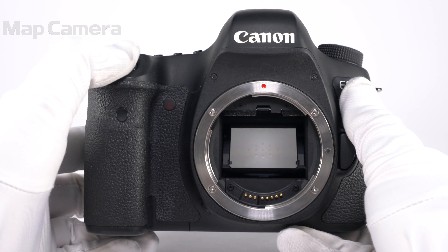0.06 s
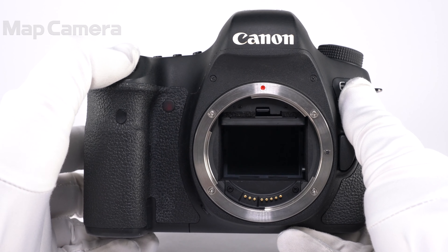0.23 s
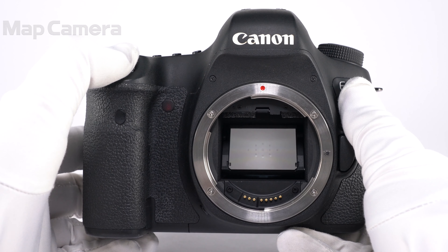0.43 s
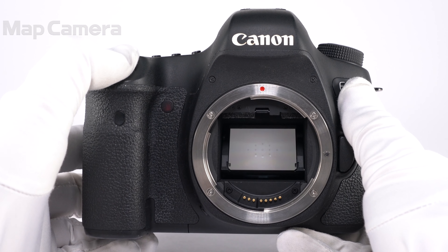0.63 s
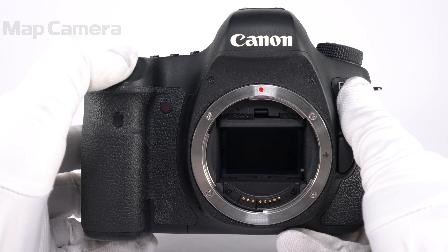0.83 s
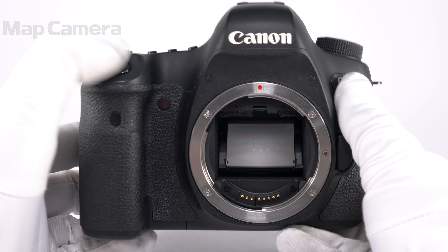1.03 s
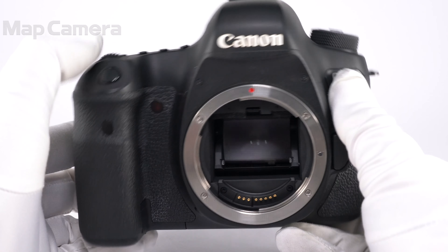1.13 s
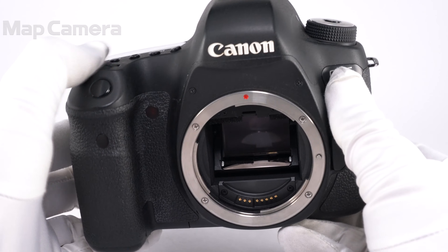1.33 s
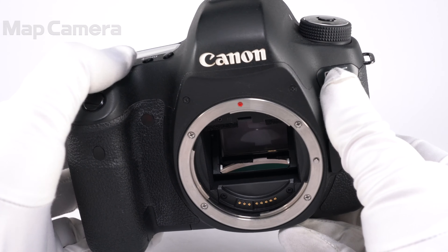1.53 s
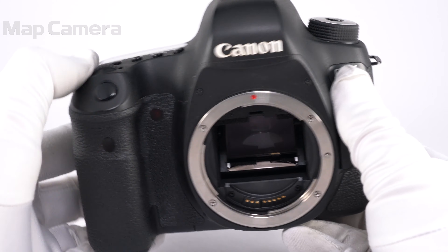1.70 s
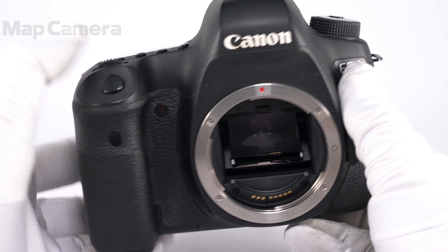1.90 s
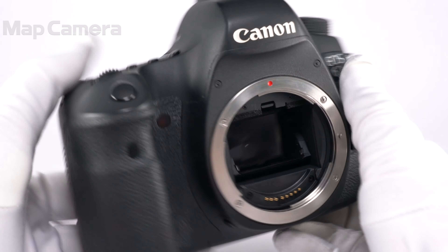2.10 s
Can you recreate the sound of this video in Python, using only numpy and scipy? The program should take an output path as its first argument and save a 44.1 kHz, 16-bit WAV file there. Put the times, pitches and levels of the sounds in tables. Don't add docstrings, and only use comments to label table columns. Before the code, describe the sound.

Three fast, loud reflex camera shutter releases up close, followed by handling bumps and small ratchety clicks

```python
import sys
import numpy as np
from scipy import signal
from scipy.fft import rfft, irfft
from scipy.io import wavfile
from scipy.ndimage import uniform_filter1d

SR = 44100
rng = np.random.default_rng(int(sys.argv[2]) if len(sys.argv) > 2 else 0)


def dump_mix(stems):
    frames = np.atleast_2d(stems).T
    limited = np.clip(frames, -1, 1)
    pcm = np.round(limited * 32767).astype(np.int16)
    wavfile.write(sys.argv[1], SR, pcm)


def makeup_ratio(level_db):
    decades = np.asarray(level_db, float) / 20
    return 10 ** decades


N = 94815


def noise(n):
    return rng.standard_normal(n)


def evened(x):
    return x / np.sqrt(np.mean(x ** 2) + 1e-20)


def add(mix, start_s, sound):
    part = mix[round(start_s * SR):][:len(sound)]
    part += sound[:len(part)]


def curve(points, t, **outside):
    return makeup_ratio(np.interp(t, *np.transpose(points), **outside))


def colour(tone, peaks=(), between_db=0):
    hz = np.fft.rfftfreq(8192, 1 / SR)
    tone_hz, tone_db = np.transpose(tone)
    broad_db = np.interp(np.log(hz + 1), np.log(tone_hz), tone_db)
    power = makeup_ratio(2 * (broad_db + between_db))
    for peak_hz, width_hz, peak_db in peaks:
        power = power + makeup_ratio(2 * peak_db) / (1 + (2 * (hz - peak_hz) / width_hz) ** 2) ** 2
    cepstrum = irfft(np.log(power + 1e-10) / 2)
    cepstrum = cepstrum * np.r_[1, 2 * np.ones(4095), 1, np.zeros(4095)]
    taps = irfft(np.exp(rfft(cepstrum)))[:4096]
    return taps / np.linalg.norm(taps)


def band(x, hz, width_hz):
    radius = np.exp(-np.pi * width_hz / SR)
    poles = [1, -2 * radius * np.cos(2 * np.pi * hz / SR), radius * radius]

    def resonate(v):
        return signal.lfilter([1, 0, -1], poles, signal.lfilter([1], poles, v))

    return resonate(x) / np.linalg.norm(resonate(np.r_[1, np.zeros(8000)]))


def blow(t, rise_s, t60_s):
    u = np.maximum(t, 0)
    rise = np.sin(np.pi / 2 * np.minimum(u / rise_s, 1)) ** 2
    return rise * makeup_ratio(-60 * np.maximum(u - rise_s, 0) / t60_s)


# pitch_hz, level_db
ROOM_TONE = [(12, -45), (20, -10.5), (60, -10.5), (262, -3.5), (388, -7.5), (1000, -13.5), (1810, -17),
             (2530, -19), (16000, -34.5)]
# pitch_hz, width_hz, level_db
HUM_BANDS = [
    (73.7, 14, -64),
    (250, 53, -61.5),
]


def room():
    air = signal.fftconvolve(noise(N + 4096), colour(ROOM_TONE), "valid")[:N]
    out = makeup_ratio(-58) * evened(air)
    for hz, width_hz, db in HUM_BANDS:
        out += makeup_ratio(db) * evened(band(noise(N + 9000), hz, width_hz)[9000:])
    whistle_hz, whistle_db = 13356, -76.5
    return out + makeup_ratio(whistle_db) * np.sin(2 * np.pi * whistle_hz * np.arange(N) / SR)


# time_s, level_db
SLIDE_LEVEL = [(0, -55.5), (.1, -62.5), (1.042, -62.5), (1.15, -58.5), (1.331, -64.5), (1.404, -46),
               (1.48, -90), (1.619, -51), (1.72, -48), (1.79, -54.5), (1.9, -47.5), (1.96, -43.5),
               (2.08, -44), (2.13, -39), (2.15, -39.5)]
# pitch_hz, width_hz, level_db
TABLE_PEAKS = [(270, 90, -16.5), (476.5, 40, 3), (660, 50, 1.5), (6500, 500, -16)]
# pitch_hz, level_db
RUB_TONE = [(35, -38), (60, -4), (124, -7.5), (301, -7), (579, -12), (682, -8.5), (1140, -10.5),
            (8510, -17), (16000, -26)]


def slide():
    grip = makeup_ratio(1.3 * evened(uniform_filter1d(noise(N), size=500)))
    rub = signal.fftconvolve(noise(N) * grip, colour(RUB_TONE, TABLE_PEAKS))[:N]
    return evened(rub) * curve(SLIDE_LEVEL, np.arange(N) / SR)


# after_release_s, level_db
MOTOR_EFFORT = [(-.010, -80.5), (-.006, -33.5), (.004, -20), (.041, -36), (.055, -22.5), (.088, -30.5),
                (.15, -28.5), (.184, -40.5), (.204, -63)]
# pitch_hz, width_hz, level_db
GEAR_RINGS = [(475, 45, -2), (930, 90, 0), (2990, 200, 0), (3450, 350, -1), (4500, 300, -7),
              (6800, 300, -6), (10500, 400, -10)]
# pitch_hz, level_db
GEAR_COLOUR = [(59, -62), (100, -31), (492, -5.5), (736, -5.5), (2630, -2.5), (3050, -1.5), (4020, -3),
               (10700, -9.5), (16000, -20)]


def motor(t):
    teeth_per_s, spread_db = 2300, 4.5
    dull_hz, dull_db, dull_from_s = 2630, 8, .15
    meets = rng.random(len(t)) < teeth_per_s / SR
    strength = makeup_ratio(spread_db * np.minimum(rng.exponential(1, len(t)), 4))
    grind = noise(len(t))
    teeth = evened(meets * strength * np.sign(grind) + 1.6 * grind)
    teeth = teeth * curve(MOTOR_EFFORT, t, left=-120, right=-120)
    dull = signal.lfilter(*signal.butter(2, dull_hz, fs=SR), teeth)
    teeth += makeup_ratio(dull_db) * (t > dull_from_s) * dull
    return signal.fftconvolve(teeth, colour(GEAR_COLOUR, GEAR_RINGS, -8))[:len(t)]


# after_release_s, level_db, rise_s, t60_s
LATCH_BLOWS = [
    (-.0045, -39, .001, .05),
    (0.0003, -7.5, .0006, 0.022),
    (.0045, -16, 0.001, 0.03),
    (.0105, -25.5, .001, .03),
    (.0125, -25.5, .001, .03),
]
MIRROR_BLOWS = [
    (.0155, -18, .003, .06),
    (.0195, -13.5, .002, .04),
    (.022, -10.5, .0012, .03),
    (.0258, -16.5, .0012, .035),
    (.0285, -13, .0012, .03),
    (.036, -35, .001, .03),
]
OPEN_BLOWS = [
    (.0438, -22, .0007, .025),
    (.047, -27, .001, .03),
    (.0502, -13, .0007, .016),
    (.0535, -23, .001, .04),
    (.0572, -23, .0008, .03),
]
SHUT_BLOWS = [
    (.0655, -12, 0.0006, 0.018),
    (.070, -23, 0.0012, 0.045),
]
RECOCK_BLOWS = [(.0915, -23.5, .002, 0.075), (.101, -16.5, .003, 0.039), (.1060, -11.5, .002, .03),
                (.1140, -18, .001, .025), (.1198, -23.5, .001, .025), (.1245, -16, .002, 0.06),
                (.1310, -14.5, .0012, .03), (.136, -27, .001, 0.025), (.1395, -12.5, .001, .025),
                (.1448, -15, .0008, 0.023), (.154, -23, .0015, 0.029), (.1625, -30, .001, .03),
                (.182, -38, .0015, .025)]
# pitch_hz, width_hz, level_db
LATCH_RINGS = [(860, 200, -8), (1870, 500, -3), (2920, 340, 0), (5200, 500, -2), (9050, 600, -2)]
MIRROR_RINGS = [(460, 70, -3), (880, 120, -6), (2570, 300, -1), (3990, 400, -4), (9300, 600, -5)]
OPEN_RINGS = [(3000, 900, -6), (6480, 400, -6), (8400, 800, -8)]
SHUT_RINGS = [(4630, 500, -4), (6730, 300, -1), (7780, 500, -19), (9500, 450, 4), (12780, 600, -7.5)]
# pitch_hz, level_db
LATCH_COLOUR = [(88, -68.5), (150, -39), (821, -1.5), (2650, -5.5), (2920, -3.5), (7180, -5.5),
                (10200, -1.5), (16000, -13.5)]
MIRROR_COLOUR = [(120, -35.5), (300, -16.5), (450, -1.5), (1200, -1), (2600, 0), (4000, -2), (9400, -3.5),
                 (16000, -18)]
OPEN_COLOUR = [(150, -38), (1500, -11), (2400, -10), (3400, -8), (4600, -12), (8000, -10), (16000, -15)]
SHUT_COLOUR = [(88, -46), (150, -38), (1870, 3.5), (4080, -5), (4860, 3.5), (10400, -3), (12700, 5),
               (16000, -18)]


def struck_parts(t, drive):
    parts = [(LATCH_BLOWS, LATCH_COLOUR, LATCH_RINGS),
             (MIRROR_BLOWS, MIRROR_COLOUR, MIRROR_RINGS),
             (OPEN_BLOWS, OPEN_COLOUR, OPEN_RINGS),
             (SHUT_BLOWS, SHUT_COLOUR, SHUT_RINGS),
             (RECOCK_BLOWS, GEAR_COLOUR, GEAR_RINGS)]
    between_db, strike_db = 1.5, -4
    out = np.zeros(len(t))
    for blows, tone, peaks in parts:
        power, click = np.zeros(len(t)), np.zeros(len(t))
        for start_s, db, rise_s, t60_s in blows:
            power += (makeup_ratio(db) * blow(t - start_s, rise_s, t60_s)) ** 2
            click[round((start_s + rise_s + .02) * SR)] = makeup_ratio(db + strike_db) * (0.0018 / rise_s)
        contact = drive * np.sqrt(power) + click
        out += signal.fftconvolve(contact, colour(tone, peaks, between_db))[:len(t)]
    return out


# after_release_s, pitch_hz, level_db, t60_s
CLEAR_RINGS = [(.0004, 5100, -13, .011), (.0004, 9500, -12, .009), (.003, 1800, -18, .025),
               (.0222, 4000, -17, .012), (.0225, 2700, -17, .02), (.0225, 460, -22, .06),
               (.0440, 6400, -23, .012), (.0503, 3400, -4, .0135), (.0505, 6500, -15, .012),
               (.0657, 4900, -10, .013), (.0657, 6750, -11, .013), (.0657, 8900, -15, .01),
               (.1045, 3450, -16, .022), (.1075, 3000, -15, .018), (.1145, 3000, -19, .016),
               (.1305, 3300, -13, .022), (.133, 960, -23, .09), (.1450, 6800, -19, .013),
               (.146, 900, -25, .08), (.181, 3500, -33, .025)]


def clacks(t):
    rise_s, sag, pitch_spread, level_spread_db = .0007, .05, .02, 0.9
    out = np.zeros(len(t))
    for start_s, hz, db, t60_s in CLEAR_RINGS:
        pitch_luck, level_luck = noise(2)
        u = np.maximum(t - start_s, 0)
        sagged_s = u - sag * np.minimum(u, t60_s) ** 2 / t60_s
        turns = hz * (1 + pitch_spread * pitch_luck) * sagged_s
        level = makeup_ratio(db + level_spread_db * level_luck)
        out += level * blow(u, rise_s, t60_s) * np.sin(2 * np.pi * turns)
    return out


# pitch_hz, level_db, t60_s
SPRING_MODES = [
    (861, 0, .4),
    (1437, -13, .55),
    (1560, -16, .25),
    (2864, -21, .2),
]


def spring():
    t = np.arange(int(.5 * SR)) / SR
    out = np.zeros(len(t))
    for hz, db, t60_s in SPRING_MODES:
        tone = np.sin(2 * np.pi * hz * t) + .22 * band(noise(len(t)), hz, 40)
        out += makeup_ratio(db) * blow(t, .015, t60_s) * tone
    return out


# start_s, level_db, spring_db
RELEASES = [
    (.2258, 0, -8),
    (.5478, 0, -1),
    (.8393, -1, -17),
]


def shutter():
    t = np.arange(int(.3 * SR)) / SR - .02
    alike, grit_db = 0.94, 2.2
    spring_after_s, spring_level_db = 0.12, -30
    habit = noise(len(t))
    grit = makeup_ratio(grit_db * evened(uniform_filter1d(noise(len(t)), size=20)))
    out = np.zeros(N)
    for start_s, db, spring_db in RELEASES:
        drive = alike * habit + np.sqrt(1 - alike ** 2) * noise(len(t))
        train = struck_parts(t, evened(drive * grit)) + motor(t) + clacks(t)
        add(out, start_s - .02, makeup_ratio(db) * train)
        add(out, start_s + spring_after_s, makeup_ratio(spring_level_db + spring_db) * spring())
    return out


# start_s, level_db, rise_s, t60_s, pitch_hz
TABLE_BUMPS = [(1.015, -38.5, 0.019, 0.15, 268), (1.019, -39.5, 0.013, 0.17, 830),
               (1.14, -41, .003, 0.19, 496), (1.144, -55.5, 0.0027, .15, 1680),
               (1.143, -42.5, 0.0054, 0.27, 250), (1.228, -45.5, .01, 0.21, 187),
               (1.266, -48.5, 0.0068, 0.22, 380), (1.29, -45, 0.02, 0.094, 306),
               (1.28, -47, 0.023, 0.56, 76), (1.33, -61, 0.011, 0.13, 250), (1.511, -49, 0.014, 0.071, 352),
               (1.85, -50, 0.024, 0.38, 251), (1.918, -42.5, 0.032, 0.28, 250),
               (2.09, -39.5, 0.028, 0.22, 308), (2.12, -44, 0.011, .2, 487)]


def bumps():
    t, out = np.arange(int(.4 * SR)) / SR, np.zeros(N)
    for start_s, db, rise_s, t60_s, hz in TABLE_BUMPS:
        thud = band(noise(len(t)) * blow(t, rise_s, t60_s), hz, 0.506 * hz)
        no_rumble = signal.butter(2, 0.7 * hz, "high", fs=SR)
        add(out, start_s, makeup_ratio(db) * signal.lfilter(*no_rumble, thud))
    return out


# start_s, peak_db, bright_hz, body_db, tick_db
DIAL_DETENTS = [
    (1.3875, -22.5, 3000, -9, 0),
    (1.406, -19, 3900, -6, 6),
    (1.4238, -14, 3200, -16, -6),
    (1.4445, -22.5, 1300, -4, -8),
    (1.6025, -36, 5000, -20, 3),
    (1.6415, -19.5, 2500, -3, -12),
    (1.6615, -13, 2500, -16, -7),
    (1.6812, -14, 2680, -18, -10),
    (1.7, -18, 2780, -14, -12),
    (1.7295, -36, 1500, -10, -4),
]
# drop_s, level_db, length_s
RAMP_SCRAPES = [
    (1.642, -36, .010),
    (1.662, -40, .003),
    (1.6815, -36, .003),
]


def dial():
    t, out = np.arange(int(.12 * SR)) / SR, np.zeros(N)
    snap = makeup_ratio(21) * (np.arange(len(t)) == 30)
    for start_s, db, hz, body_db, tick_db in DIAL_DETENTS:
        rattle, thump, scratch = noise((len(t), 3)).T
        first = snap + rattle * blow(t, 0.00082, 0.028)
        knock = snap + thump * blow(t, 0.0022, 0.03)
        sound = band(first, hz, 890) + 0.48 * band(first, 0.715 * hz, 560)
        sound += makeup_ratio(body_db) * band(knock, 888, 200)
        sound += makeup_ratio(tick_db - 1.5) * band(scratch * blow(t, 0.00013, 0.033), 5670, 3400)
        sound = sound / abs(sound).max()
        sound += makeup_ratio(-17.5) * band(scratch, 2950, 4600) * blow(t, 0.002, 0.075)
        add(out, start_s, makeup_ratio(db - 1.5) * sound)
    for drop_s, db, length_s in RAMP_SCRAPES:
        ramp = np.minimum(t / length_s, 1) ** 2 * (t < 1.2 * length_s)
        add(out, drop_s - length_s, makeup_ratio(db) * band(noise(len(t)) * ramp, 2860, 2600))
    return out


def scene():
    mid = shutter() + dial() + bumps() + slide() + room()
    return np.array([mid, mid])


# start_s, length_s, low_hz, top_hz, level_db
CHANNELS_DIFFER = [(0.218, 0.008, 5000, 16000, -10), (0.243, 0.01, 12500, 16000, -13),
                   (.287, .006, 12500, 16000, -13), (0.546, 0.012, 4000, 16000, -8),
                   (.568, .014, 8000, 12500, -3), (.568, .055, 4200, 16000, -12),
                   (.612, .01, 5000, 8000, -5), (.55, .03, 300, 3500, -24), (0.836, 0.011, 5000, 16000, -4),
                   (0.872, 0.028, 5000, 10000, -14), (.902, .008, 6800, 9000, -6),
                   (.902, .008, 13500, 15500, -6), (0.935, 0.035, 6800, 8500, -10),
                   (.96, .04, 11800, 15500, -13), (1.539, .6, 12500, 16000, -10)]


def roll_off(x):
    return signal.sosfilt(signal.butter(12, 16570, fs=SR, output="sos"), x)


def record(dry):
    mid, t, side = dry[0], np.arange(N) / SR, np.zeros(N)
    scrambled = mid * rng.choice([-1., 1.], N // 24 + 1).repeat(24)[:N]
    for start_s, length_s, low_hz, top_hz, db in CHANNELS_DIFFER:
        bandpass = signal.butter(6, [low_hz, top_hz], "band", fs=SR, output="sos")
        gate = uniform_filter1d(1. * (t > start_s) * (t < start_s + length_s), size=90)
        side += makeup_ratio(db) * gate * signal.sosfilt(bandpass, scrambled)
    stereo = np.clip([mid + side, mid - side], -.93, .93)
    lowpass = signal.firwin(255, 16250, window=("kaiser", 8), fs=SR)
    return roll_off(signal.oaconvolve(stereo, lowpass[None], "same"))


dry = scene()
out = record(dry)
dump_mix(out)
```